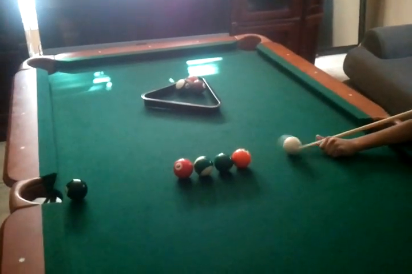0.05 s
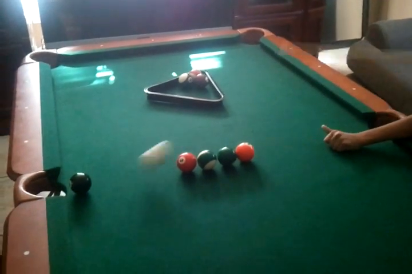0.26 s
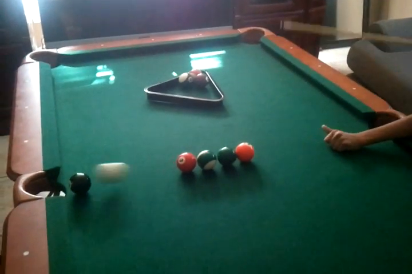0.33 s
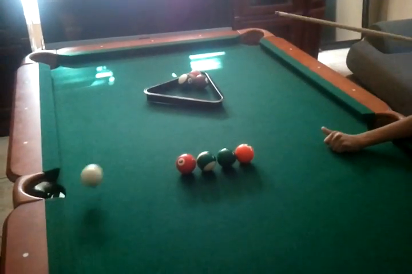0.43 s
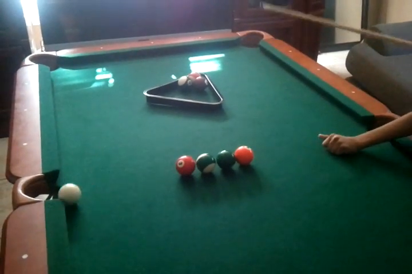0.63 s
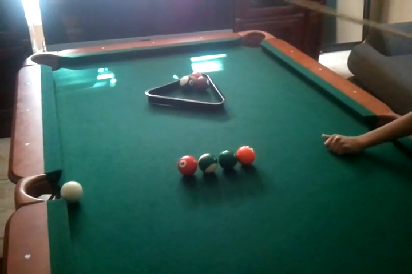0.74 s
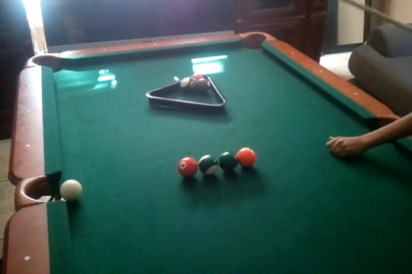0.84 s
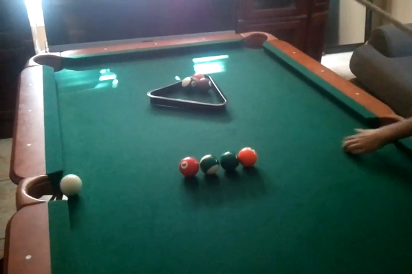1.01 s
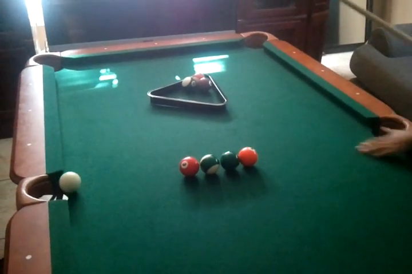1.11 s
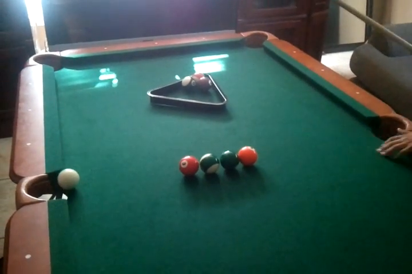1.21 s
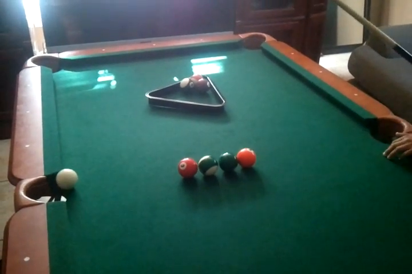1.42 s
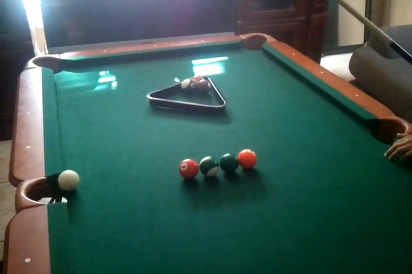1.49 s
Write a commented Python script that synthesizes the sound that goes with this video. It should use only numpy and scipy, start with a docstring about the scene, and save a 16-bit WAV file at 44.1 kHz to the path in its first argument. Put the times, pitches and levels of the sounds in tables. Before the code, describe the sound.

Billiard balls crack together after a cue strike, and one thuds into a pocket.

```python
"""Jump shot on a pool table

In a bare, echoing room the cue clicks on the white ball and drives it into the slate. The ball lands
hard, cracks against the black and rumbles on. The black thuds into the pocket and clicks against the
balls lying there. Each hit is a sharp pulse with a short ring and the room's echo. A small microphone
close by overloads on the loud blows."""
import sys
import numpy as np
from scipy import signal
from scipy.fft import rfft, irfft, next_fast_len
from scipy.io import wavfile
from scipy.ndimage import uniform_filter1d, minimum_filter1d

SR = 44100
rng = np.random.default_rng(int(sys.argv[2]) if len(sys.argv) > 2 else 0)


def generate_wav(signal):
    """Clip the signal to [-1, 1] and save it as 16-bit WAV at the path in sys.argv[1]."""
    frames = np.transpose(np.atleast_2d(signal))
    scaled = np.clip(frames, -1, 1) * 32767
    pcm = np.round(scaled).astype(np.int16)
    wavfile.write(sys.argv[1], SR, pcm)


N = 68355

# the notes a struck table rings with (f/Hz, level/dB, fade/s); a fade is the time to drop by 60 dB
TABLE_NOTES = [(150.5, -10.5, 0.23), (187, -7.5, 0.38), (228.5, -0.5, 0.5), (333.5, -0.5, 0.68),
               (454.4, -7.5, 0.67), (504.7, -5, 0.66), (737, -3.5, .5), (849, -9, 0.85), (1110, -4.5, .55),
               (1240, -7.5, 0.4), (1450, -6, .45), (1540, -7.5, .45)]


def landing():
    """The heavy white ball lands and chatters, making the table ring."""
    bounces = [(0.4851, -2.5, 0.5), (.501, -7.5, 1), (.512, -5.5, 1)]  # t/s, level/dB, brightness/(dB per octave)
    wood_tone = [(40, -52), (90, -26.5), (150, -7.5), (330, 3.5), (650, -2), (1100, -2.5), (1600, -9),
                 (2500, -18.5), (4500, -25), (8000, -38)]  # a woody knock: f/Hz, level/dB
    out = np.zeros(N)
    for start, db, brightness in bounces:
        knock = hit(wood_tone, brightness, fade=.12, body_db=6.5, room_db=4)
        add(out, start, amp(db) * (knock + amp(-12) * ring(TABLE_NOTES)))
    return out


def cue():
    """The tip clicks and the shaft rings; at once the ball thumps into the slate."""
    strokes = [(0.2193, -15.5)]  # tip meets ball: t/s, level/dB
    tip_tone = [(150, -18.5), (500, -8), (1000, -9), (1300, -8), (2100, 2), (2900, -9), (3600, -5),
                (4600, -11.5), (6200, -10.5), (8000, -17.5)]  # its click: f/Hz, level/dB
    tip_notes = [(0, 6200, 11, .012), (0, 3520, -3, 0.017), (.0016, 2100, 14, .014)]  # tip and ball ring briefly: delay/s, f/Hz, level/dB, fade/s
    shaft_notes = [(950, -1, 0.23), (1507, -0.5, 0.61), (1750, -3, 0.53), (2025, -1.5, 0.39),
                   (2350, -2, 0.61), (2740, -2, 0.3)]  # the wooden shaft: f/Hz, level/dB, fade/s
    launches = [(.2238, -12.5)]  # ball meets slate: t/s, level/dB
    slate_tone = [(40, -37), (100, -7), (220, -4.5), (380, -4), (520, -4.5), (900, -16.5), (2000, -32),
                  (6000, -57)]  # its thump: f/Hz, level/dB
    slate_notes = [(226.9, 3, 0.24), (375.6, -10, 0.21)]  # the slate's deep ring: f/Hz, level/dB, fade/s
    out = np.zeros(N)
    for start, db in strokes:
        click = hit(tip_tone, fade=.08, body_db=5, room_db=9)
        add(out, start, amp(db) * (click + ping(tip_notes) + amp(-10) * ring(shaft_notes)))
    for start, db in launches:
        thump = hit(slate_tone, fade=.12, body_db=5.5, room_db=5.5)
        add(out, start, amp(db) * (thump + amp(.5) * ring(slate_notes)))
    return out


def ball_clicks():
    """Hard balls click brightly against each other and on the pocket's rim."""
    cracks = [(0.5374, -7)]  # white hits black: t/s, level/dB
    crack_tone = [(100, -23), (500, -7.5), (1300, -1.5), (2300, 0.5), (3000, -3.5), (4200, -4.5),
                  (5600, -17.5), (7200, -20.5), (8500, -25.5)]  # f/Hz, level/dB
    ticks = [(0.6702, -33), (0.9028, -40)]  # thin ticks on the rim: t/s, level/dB
    rim_tone = [(500, -29), (3400, -23), (4400, 3.5), (5400, -6), (7000, -4), (8500, -9.5)]  # f/Hz, level/dB
    clacks = [(0.9161, -34, -1), (0.93, -38, 3), (1.0759, -33, -0.5), (1.184, -39, 1)]  # balls settle in the pocket: t/s, level/dB, brightness/(dB per octave)
    ball_tone = [(100, -18.5), (500, -15), (1400, -8.5), (1900, -3.5), (2350, -1), (2900, -5), (3700, -7.5),
                 (4800, -14.5), (5700, -5), (6400, -12), (8000, -16.5)]  # f/Hz, level/dB
    ball_notes = [(0, 2335, 9.5, .022), (0, 5820, -6, 0.013), (.0042, 2050, 4, .016)]  # their short ring: delay/s, f/Hz, level/dB, fade/s
    out = np.zeros(N)
    for start, db in cracks:
        add(out, start, amp(db) * hit(crack_tone, fade=.044, body_db=7, room_db=5.5))
    for start, db in ticks:
        add(out, start, amp(db) * hit(rim_tone, fade=.0075, body_db=7, room_db=3.5))
    for start, db, brightness in clacks:
        clack = hit(ball_tone, brightness, fade=.13, body_db=5.5, room_db=9)
        add(out, start, amp(db) * (clack + ping(ball_notes)))
    return out


def pocket_drop():
    """The black ball tumbles into the pocket and the table rings again."""
    drops = [(0.6683, -11, 0.5), (.686, -14, -1), (.711, -22.5, 0), (0.7486, -17.5, -2)]  # t/s, level/dB, brightness/(dB per octave)
    pocket_tone = [(40, -40.5), (100, -23), (170, -6.5), (330, 1), (470, -0.5), (690, -7.5), (830, -1),
                   (1050, -4.5), (1500, -11), (2400, -21.5), (4000, -38.5), (8000, -47.5)]  # a dull thud: f/Hz, level/dB
    out = np.zeros(N)
    for start, db, brightness in drops:
        thud = hit(pocket_tone, brightness, fade=.067, body_db=5.5, room_db=4.5)
        add(out, start, amp(db) * (thud + amp(-13.5) * ring(TABLE_NOTES)))
    return out


def hit(tone, brightness=0, *, fade, body_db, room_db):
    """One blow: a sharp pulse, its near echoes, the struck body's noisy ring and the room."""
    echoes = [(.0021, 0.58), (.0047, 0.4), (.0085, .3), (0.0144, .35), (0.0197, 0.26)]  # off nearby surfaces: delay/s, gain
    t = np.arange(N) / SR
    body = rng.standard_normal(N) * 1000 ** (-t / fade)
    blow = amp(body_db) * body / np.linalg.norm(body) + amp(room_db) * room()
    blow[0] += 1  # the pulse
    for delay, gain in echoes:
        blow[round(delay * rng.uniform(.85, 1.15) * SR)] += gain

    def tone_db(hz):
        return along(tone, hz) + brightness * np.log2(np.clip(hz, 200, 9000) / 1000)
    return unit(coloured(blow, tone_db), SR // 30)


def ring(notes):
    """An object's own notes die away; each blow starts them a little differently."""
    t = np.arange(N) / SR
    out = np.zeros(N)
    for hz, db, fade in notes:
        loudness = amp(db + rng.normal(0, 1.5)) * 1000 ** (-t / fade)
        out += loudness * np.sin(2 * np.pi * (hz * t + rng.random()))
    return out * (1 - np.exp(-t / .001))


def ping(notes):
    """A few high notes that die within milliseconds."""
    t = np.arange(N) / SR
    rise = 1 - np.exp(-t / .0003)
    out = np.zeros(N)
    for delay, hz, db, fade in notes:
        add(out, delay, amp(db) * 1000 ** (-t / fade) * np.sin(2 * np.pi * hz * t) * rise)
    return out


def room():
    """Echoes off the walls blur into noise; high pitches die away sooner."""
    fades = [(80, 0.66), (300, 0.6), (1000, 0.58), (2500, 0.57), (5000, 0.5), (8000, 0.42)]  # how long the echo lasts: f/Hz, fade/s
    echo_tone = [(100, -4.5), (400, 0.5), (2000, 0), (4000, -4.5), (7000, -7)]  # how much comes back: f/Hz, level/dB
    hz, t, spectrum = signal.stft(rng.standard_normal(N), SR, nperseg=256)
    fading = amp(-60 * t / along(fades, hz)[:, None])
    tail = signal.istft(spectrum * fading, SR, nperseg=256)[1][:N]
    tail *= 1 - np.exp(-np.arange(N) / SR / .012)  # builds up over about 12 ms
    return coloured(tail / np.linalg.norm(tail), lambda hz: along(echo_tone, hz))


def roll():
    """The white ball rumbles as it slows on the cloth."""
    levels = [(0.551, -63), (.92, -49), (1.15, -56.5), (1.55, -59)]  # the rumble's rise and fall: t/s, level/dB
    rumble_tone = [(25, -16.5), (55, 2), (100, -15), (200, -10.5), (500, -20), (2000, -56.5)]  # f/Hz, level/dB
    db = np.interp(np.arange(N) / SR, *np.transpose(levels), left=-120)
    return amp(db) * noise(rumble_tone)


def background():
    """The steady hush of the room and one faint swell of hiss."""
    hush_tone = [(24, -67), (40, -20.5), (230, -15), (269, -1), (288, -12.5), (368, -9), (690, -16.5),
                 (1080, -14.5), (2650, -23), (7600, -25), (8500, -28.5), (11000, -92), (18700, -120)]  # f/Hz, level/dB
    swells = [(1.34, .07, -53)]  # peak t/s, half width/s, level/dB
    hiss_tone = [(500, -30), (3500, -14), (7000, 5), (9000, -5.5)]  # f/Hz, level/dB
    t = np.arange(N) / SR
    swell = sum(amp(db) * np.exp(-((t - peak) / width) ** 2) for peak, width, db in swells)
    return amp(-50.5) * noise(hush_tone) + swell * noise(hiss_tone)


def noise(tone):
    """Steady noise with the given tone and an average (rms) level of 1."""
    return unit(coloured(rng.standard_normal(N), lambda hz: along(tone, hz)), N)


def coloured(x, gain_db):
    """Turn each frequency up or down by gain_db(hz)."""
    size = 2 * next_fast_len(N)
    gain = np.maximum(amp(gain_db(np.fft.rfftfreq(size, 1 / SR))), 1e-6)
    cepstrum = irfft(np.log(gain), size)
    # folding this in half makes the filter ring only after a blow, never before
    cepstrum[1:size // 2] *= 2
    cepstrum[size // 2 + 1:] = 0
    return irfft(rfft(x, size) * np.exp(rfft(cepstrum)), size)[:N]


def along(points, hz):
    """Read between (f/Hz, value) points on a pitch scale."""
    freqs, values = np.transpose(points)
    return np.interp(np.log(hz + 1), np.log(freqs + 1), values)


def amp(db):
    """Turn decibels into a multiplier."""
    return 10 ** (np.asarray(db) / 20)


def unit(x, span):
    """Scale x so its first span samples have an average (rms) level of 1."""
    return x / np.sqrt(np.mean(x[:span] ** 2) + 1e-20)


def add(out, start, sound):
    """Mix a sound in at start seconds."""
    i = round(start * SR)
    out[i:] += sound[:N - i]


def scene():
    """All the sounds meet at one microphone."""
    return (cue() + landing() + pocket_drop() + ball_clicks() + roll() + background())[None]


def record(dry):
    """The microphone squashes loud peaks and loses the deepest bass and highest treble."""
    treble_loss = [(7000, -1), (8000, -3.5), (8700, -19), (9200, -43)]  # f/Hz, level/dB
    limit, hold = 1.5, int(.0065 * SR)  # peaks above the limit turn the volume down briefly
    overload, hardness = .74, 5  # what is left is rounded off below the overload level
    low_hz, top_hz = 58.5, 9458
    needed_gain = limit / np.maximum(np.abs(dry), limit)
    held = dry * uniform_filter1d(minimum_filter1d(needed_gain, hold), hold)
    clipped = held / (1 + np.abs(held / overload) ** hardness) ** (1 / hardness)
    size = 2 * next_fast_len(N)
    hz = np.fft.rfftfreq(size, 1 / SR)
    bass_cut = hz ** 2 / np.hypot(hz ** 2, low_hz ** 2) * hz / np.hypot(hz, low_hz)
    treble_cut = amp(along(treble_loss, hz)) * (hz < top_hz)
    return irfft(rfft(clipped, size) * bass_cut * treble_cut, size)[:, :N]


dry = scene()
out = record(dry)
generate_wav(out)
```